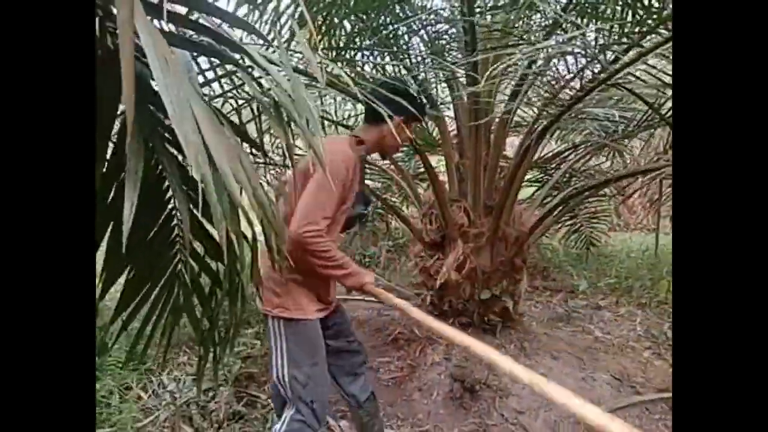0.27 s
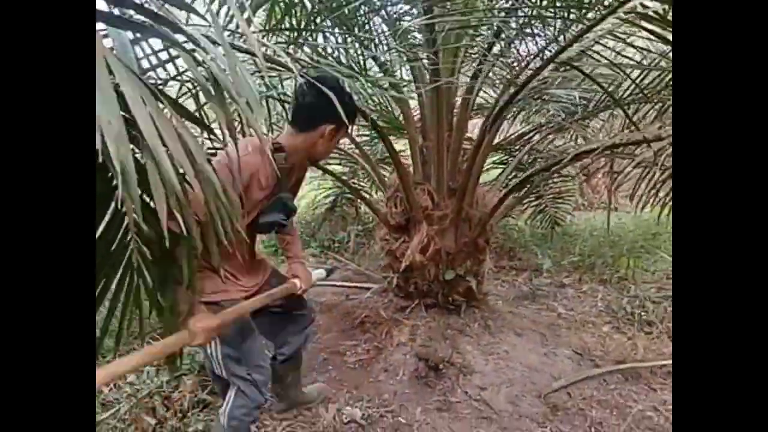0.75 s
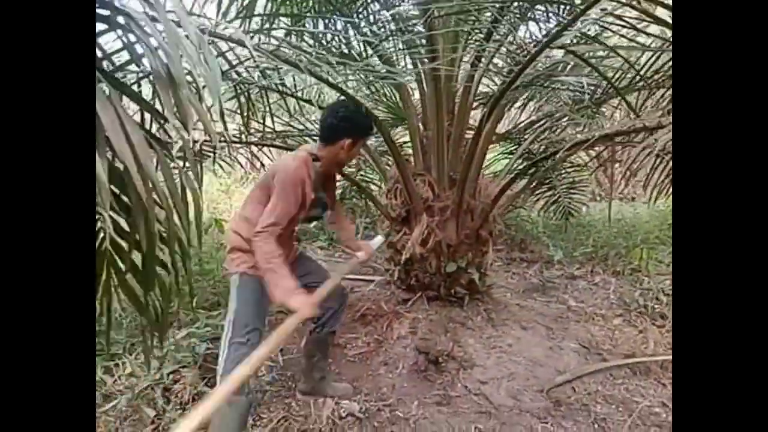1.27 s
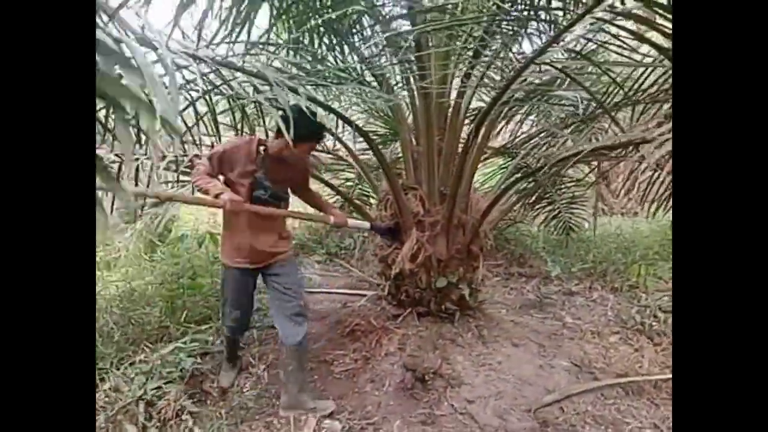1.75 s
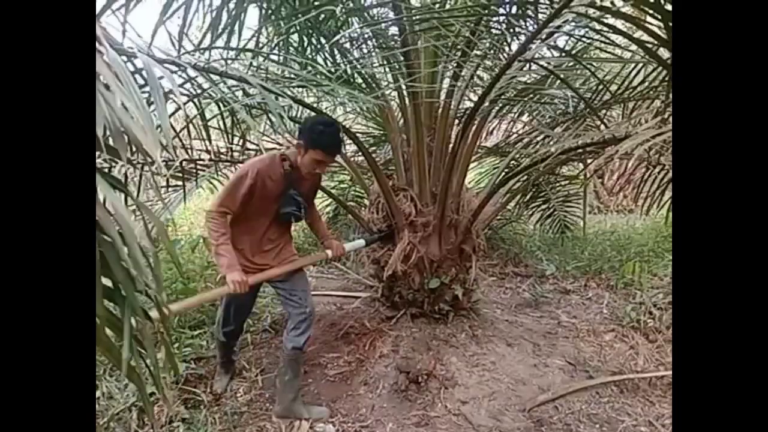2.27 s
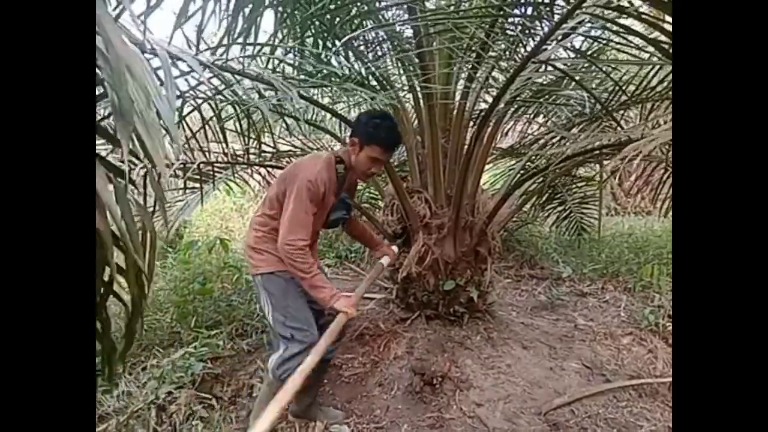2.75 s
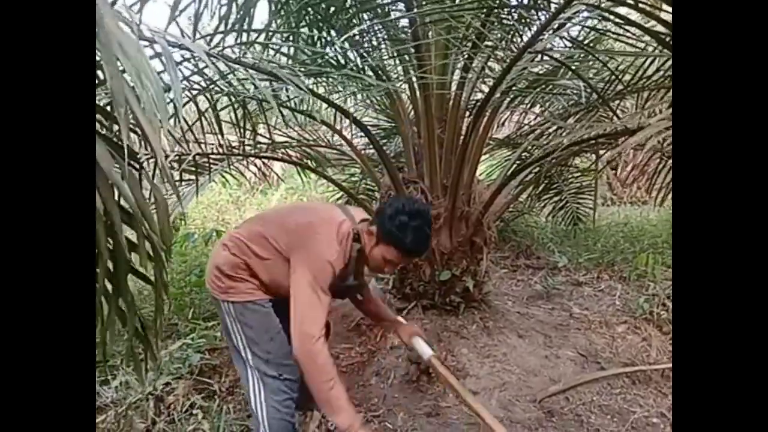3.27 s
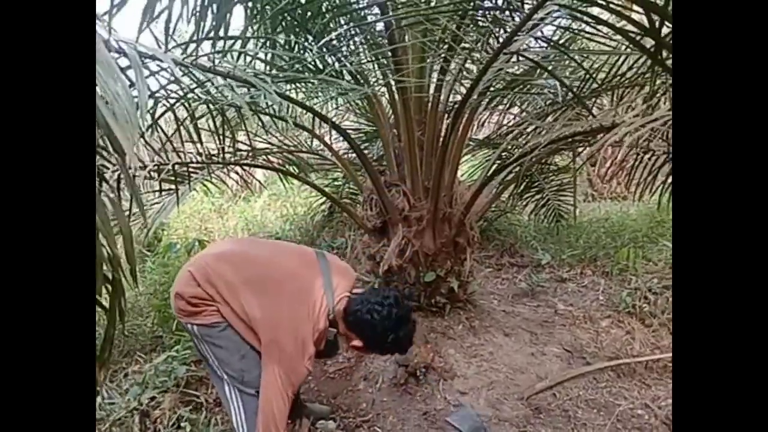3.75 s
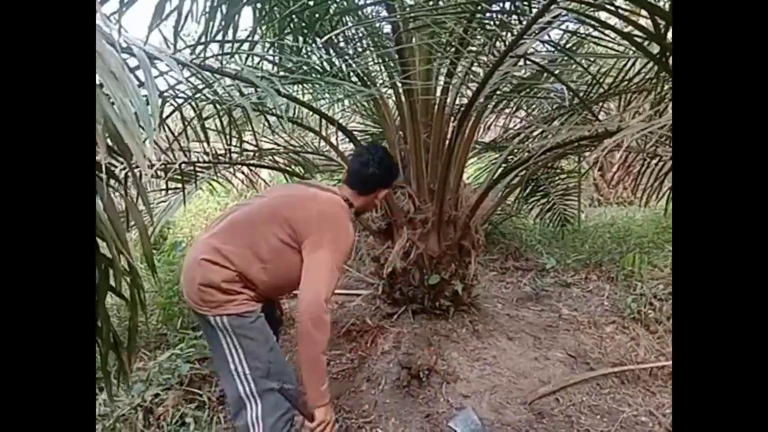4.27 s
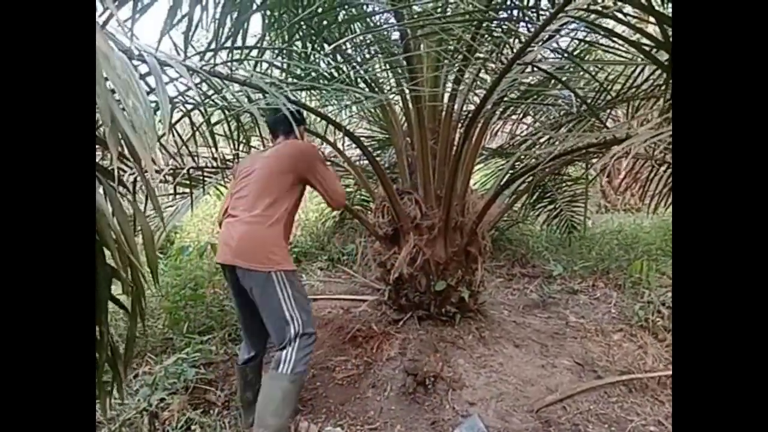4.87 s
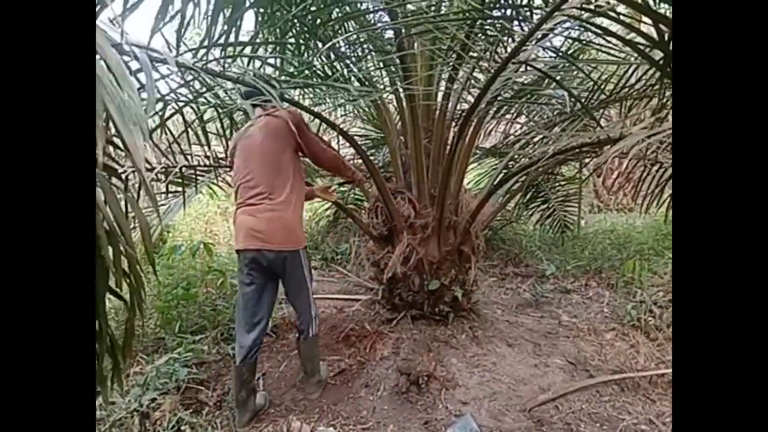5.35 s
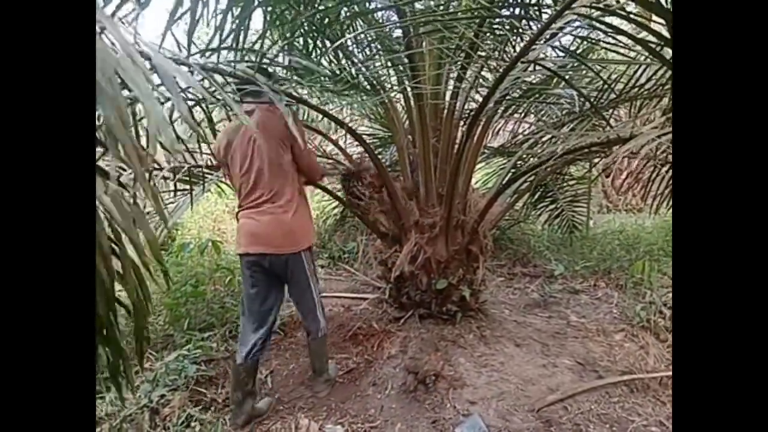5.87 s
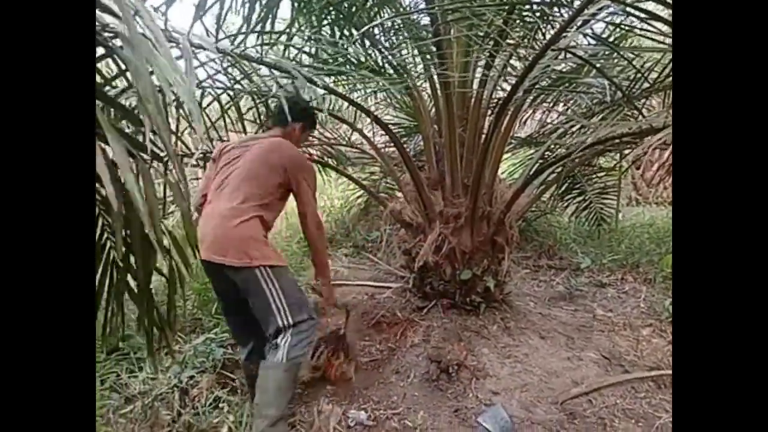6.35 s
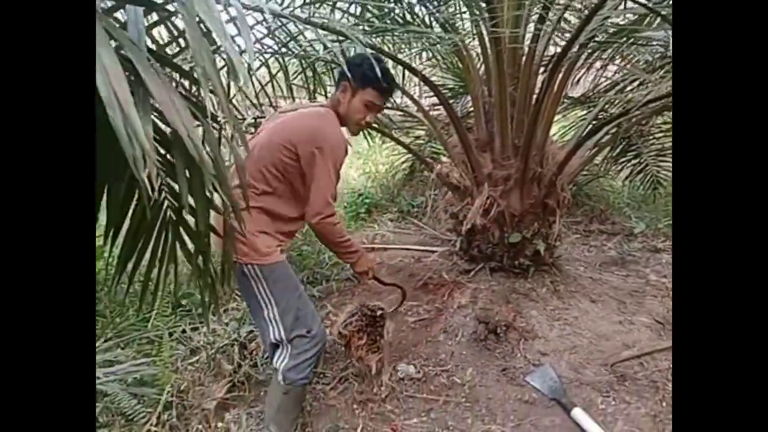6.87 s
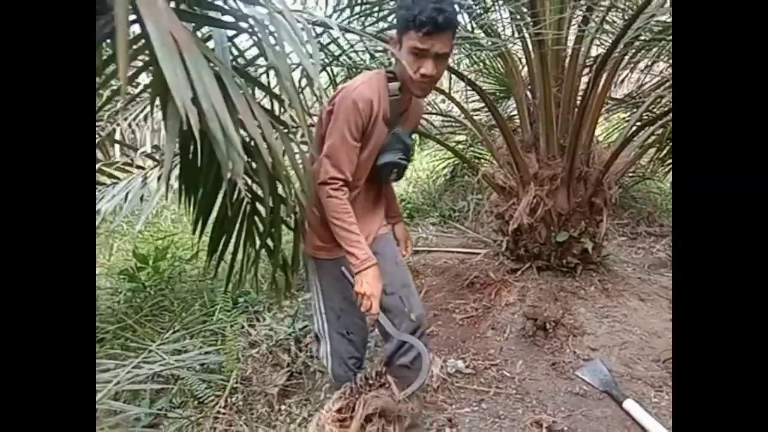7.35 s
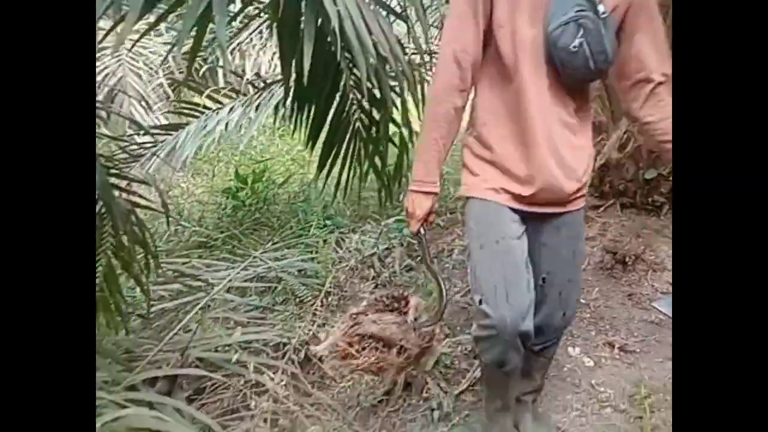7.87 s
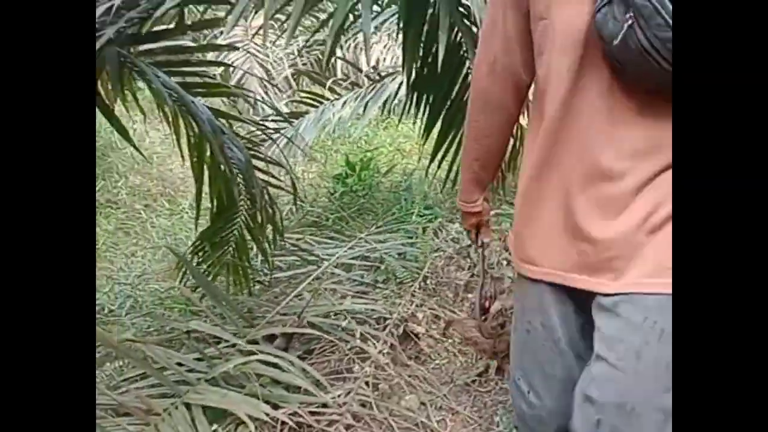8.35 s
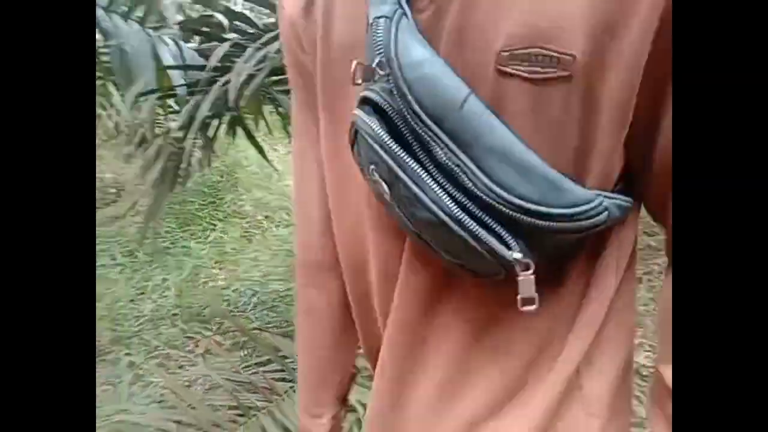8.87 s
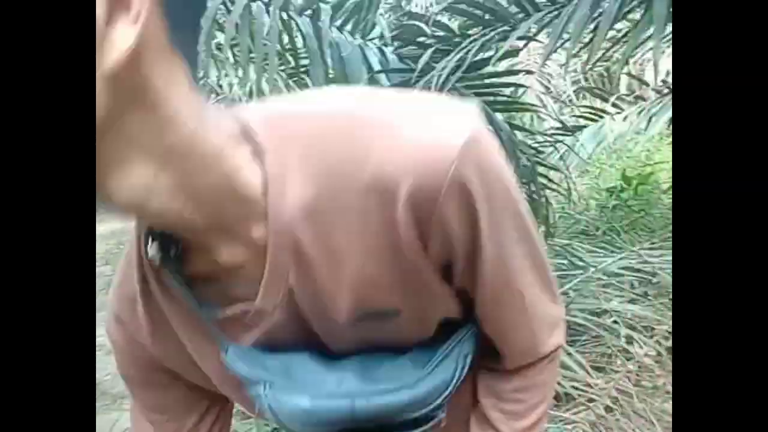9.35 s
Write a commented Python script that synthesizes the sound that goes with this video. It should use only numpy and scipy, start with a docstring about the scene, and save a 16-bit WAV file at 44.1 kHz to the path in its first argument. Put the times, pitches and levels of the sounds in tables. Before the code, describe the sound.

Close, slightly clipped phone pickup among palms. Dry leaves brush, then a crunchy chop and loud tearing cracks burst out together. Woody knocks and creaks follow as the blade is levered, and the pole lands on soil with twig snaps and a faint steel ring. After a quieter pause a hook bites fibre; scattered snaps, soft thuds, boot crunches and frond swishes finish over a faint high cricket trill.

```python
"""In an oil-palm plantation a worker drives a long chisel into a palm; a frond stalk splits, the pole drops.
A steel hook then spikes a fruit bunch, which is dragged and tossed on dry fronds as boots crunch through litter.
Fracture is modelled by random grains, struck bodies by decaying modes, sliding leaves by shaped noise.
Insects trill as modulated tones and the air is faint noise; a phone with one microphone stands close by."""
import sys
import numpy as np
from scipy import signal
from scipy.fft import rfft, irfft
from scipy.io import wavfile
from scipy.ndimage import uniform_filter1d

SR = 44100
rng = np.random.default_rng(int(sys.argv[2]) if len(sys.argv) > 2 else 0)


def put_to_file(sound):
    """Save the sound as 16-bit audio at rate SR, in the file named by the first command-line argument."""
    columns = np.atleast_2d(sound).T  # one column per channel
    safe = np.clip(columns, -1, 1)
    whole_steps = np.round(safe * 32767)
    wavfile.write(sys.argv[1], SR, whole_steps.astype(np.int16))


N = 423360
TIME = np.arange(N) / SR
AGE = TIME[:SR]  # time since a blow, one second long

# Levels in the tables precede the grove's echo and the phone's response.
# Chisel and hook driven into wet fibre: [t/s, level/dB before a common trim, t60/s, tilt/(dB per octave)]
BLADE_CHOPS = [(1.302, 0.5, 0.13, -0.2), (1.327, -5, 0.049, -2.5), (5.225, -5, 0.087, 2)]
# Bundles of the stalk splitting: [t/s, peak level/dB, tilt/(dB per octave)]
BUNDLE_CRACKS = [(1.5213, 0, 1), (1.5423, 2.5, 2.5), (1.559, -1.5, -2), (1.571, 1, 4.8), (1.5958, 2.5, 0.2),
                 (1.619, -11.5, 4), (1.6269, -3.5, -1.5)]
# Blade knocking on the damp stalk: [t/s, peak level/dB, splinter level/dB against the wood]
BLADE_KNOCKS = [(1.92, -25, -11), (2.024, -19.5, 18), (2.0655, -20.5, 7), (2.098, -15.5, 1.5),
                (2.835, -8.5, 10), (2.878, -11.5, 25), (5.921, -18, -21)]
# Stalk rubbed and strained: [t/s at the height, level/dB, half length/s]
STALK_CREAKS = [(1.177, -35.5, 0.056), (2.152, -36, 0.08), (2.801, -26.5, 0.015), (2.848, -31, 0.031)]
# Litter and fibre crushed: [t/s at the height, level/dB, half length/s, tilt/(dB per octave)]
LITTER_CRUNCHES = [(0.154, -20, 0.038, 1), (0.528, -31, 0.0067, 2.5), (1.503, -26.5, 0.055, -3),
                   (1.612, -18.5, 0.024, 2), (2.42, -34.5, 0.014, 5.5), (2.617, -40, 0.018, 4),
                   (2.837, -29.5, 0.043, -2.5), (3.202, -14, 0.0067, 17), (3.351, -33, 0.026, -2.5),
                   (3.481, -16.5, 0.015, 7), (3.504, -11, 0.0051, 2.5), (3.726, -27, 0.029, -1.5),
                   (4.009, -25.5, 0.015, 7), (4.132, -31, 0.015, 3), (5.753, -16.5, 0.0058, -1),
                   (5.777, -8.5, 0.008, 2), (5.882, -14.5, 0.0079, 2.5), (6.337, -30, 0.014, 3.5),
                   (6.389, -19.5, 0.014, 1), (6.6, -22, 0.0048, 3), (6.778, -27.5, 0.016, 2.5),
                   (7.506, -29.5, 0.0083, -3.5), (8.058, -15.5, 0.0091, 1), (8.685, -30.5, 0.023, -7),
                   (8.712, -15.5, 0.0064, 6), (9.308, -12.5, 0.0054, -3.5)]
# Dry twigs and leaflets snapping: [t/s, peak level/dB, f/Hz]
TWIG_SNAPS = [(0.025, -4, 3770), (0.875, -3, 10600), (1.124, -10.5, 7100), (1.61, -4, 6900),
              (1.652, -2, 9500), (2.321, -19, 7320), (3.332, 2.5, 5560), (3.36, -5, 3170),
              (3.482, -1, 2720), (4.002, -17, 5300), (5.693, -0.5, 9000), (6.372, -9, 3800),
              (6.421, -13, 2060), (6.601, -4.5, 3630), (6.686, 0, 11900), (7.101, -12, 4430),
              (7.214, -11.5, 3900), (7.778, -19, 1990), (8.057, -13, 2400), (8.079, -5, 3020),
              (8.45, -12, 2000), (8.581, 2, 7400), (8.714, -5.5, 2460), (8.782, -13, 1440)]
# Boots, pole and fruit landing on soil: [t/s, peak level/dB, f/Hz, nominal t60/s]
SOIL_THUDS = [(1.22, -27.5, 190, 0.2), (1.592, -24, 248, 0.23), (2.976, -13, 137, 0.07),
              (3.468, -19.5, 360, 0.11), (3.501, -11.5, 119, 0.046), (3.516, -12.5, 91, 0.2),
              (3.56, -31, 206, 0.67), (3.693, -25.5, 320, 0.11), (3.733, -22, 291, 0.051),
              (3.75, -24.5, 101, 0.08), (4.156, -39, 300, 0.27), (4.71, -41, 283, 0.16),
              (5.228, -15.5, 363, 0.1), (5.774, -13, 305, 0.057), (6.341, -22.5, 138, 0.14),
              (6.383, -18, 169, 0.041), (6.404, -21, 112, 0.073), (6.419, -14.5, 454, 0.02),
              (6.559, -15.5, 228, 0.038), (8.003, -30, 169, 0.1), (8.042, -18, 171, 0.066),
              (8.688, -16.5, 246, 0.073), (9.241, -11, 335, 0.048), (9.257, -18, 121, 0.095),
              (9.279, -12, 134, 0.082), (9.317, -14.5, 234.6, 0.2)]
# Hollow pole and handle knocked: [t/s, peak level/dB, f/Hz, t60/s]
POLE_KNOCKS = [(.286, -17, 1320, 0.058), (3.519, -6, 985, 0.049), (3.738, -17, 950, 0.03),
               (8.953, -12, 725, 0.015), (9.177, -15.5, 1340, 0.023)]
# Steel touched: [t/s, peak level/dB, ring time/s, f/Hz of the mode favoured by the point of contact]
STEEL_CLINKS = [(2.88, -20, 0.13, 3420), (4.001, -23, 0.2, 3170), (4.138, -21.5, 0.2, 5100),
                (4.29, -28.5, 0.51, 3420)]
# Hook dragged over grit: [t/s at the height, level/dB, half length/s]
HOOK_DRAGS = [(3.961, -42.5, 0.043), (4.134, -42.5, 0.16)]
# Fronds brushed by the pole, a leg or the bunch:
# [t/s at full contact, level/dB, attack/s, hold/s, release/s, treble balance/dB: high for dry fine leaves]
FROND_BRUSHES = [(0, -25, .02, 0.24, 0.32, -5.5), (0.747, -35.5, 0.082, 0.038, 0.1, 0),
                 (0.889, -46, 0.068, 0.013, 0.201, 5), (1.131, -38, 0.082, 0.069, 0.45, -2),
                 (1.371, -33.5, 0.1, 0.14, .1, -9.5), (1.555, -24.5, 0.068, 0.12, 0.27, -8),
                 (1.916, -32, 0.042, 0.013, 0.033, -8.5), (2.087, -42, .25, 0.053, 0.32, -9),
                 (2.974, -41.5, .04, 0.044, 0.061, -8), (3.189, -39.5, .03, 0.08, 0.12, 1.5),
                 (3.34, -33.5, .05, 0.016, 0.16, 0.5), (3.519, -33.5, 0.06, 0.0092, 0.17, -13),
                 (3.717, -34.5, 0.054, 0.022, 0.084, 2), (4.1, -41.5, 0.084, 0.03, 0.24, 0),
                 (4.755, -47.5, 0.076, 0.011, 0.033, -7), (5.323, -47.5, 0.084, 0.022, 0.26, -11),
                 (5.702, -23, 0.046, 0.18, 0.13, -7), (6.572, -31.5, 0.096, 0.057, 0.12, -8),
                 (6.766, -43.5, 0.11, 0.35, 1, -7.5), (7.514, -39.5, 0.22, 0.036, 0.21, -12.5),
                 (7.821, -37.5, 0.042, 0.0074, 0.036, -15), (7.999, -25, 0.02, 0.062, 0.1, -8),
                 (8.155, -28.5, 0.16, 0.05, 0.21, -4.5), (8.586, -30.5, 0.22, 0.16, 0.052, -7),
                 (8.851, -45, 0.096, 0.11, .2, -20), (9.093, -37, 0.068, 0.11, 0.11, -9),
                 (9.305, -27, 0.1, 0.022, 0.098, -14), (9.473, -38, 0.13, 0.012, 0.25, -12.5)]

# Modes of the steel: [f/Hz, level/dB, share of the ring time]
STEEL_MODES = [(2277, -5, 0.4), (2440, -4.5, 0.6), (3170, -2.5, 0.46), (3420, -1, 0.99), (3920, -5, .55),
               (5100, 2.5, 0.31), (5590, -5, 0.28)]
# Modes of the frond stalk: [mean f/Hz, mean level/dB, t60/s]
STALK_MODES = [(301, -0.5, 0.06), (696, 3.5, 0.037), (811, 5, 0.023), (1260, -7, 0.031), (1580, -5, 0.058),
               (2130, -12, 0.025), (2860, -10.5, 0.022)]
# Resonances and dips of the phone's port: [f/Hz, quality, level/dB]
PORT_RESONANCES = [(1262, 25.7, 10.5), (6335, 8.6, -8.5), (8060, 7.6, -8), (13160, 2.9, -9.5),
                   (14500, 10, 8.5)]

# Relative spectra of leaves, wet fibre, air and one split: [f/Hz, level/dB per Hz]
LEAF_SPECTRUM = [(40, -45.5), (90, -13), (300, -6), (480, -4.5), (700, -4), (1000, -3), (1400, -1),
                 (1900, -4), (3200, -1), (4400, -5.5), (5600, -2.5), (9800, -10.5), (15500, -18.5)]
FIBRE_SPECTRUM = [(60, -40), (120, -10.5), (450, -12.5), (720, 5), (1000, -9.5), (1300, -2.5), (1700, -5),
                  (2500, -0.5), (4200, -7.5), (5500, -6), (9000, -12.5), (15500, -29.5)]
AIR_SPECTRUM = [(20, -13.5), (50, 5.5), (110, 9.5), (260, 5), (600, -1), (1200, -3), (2000, -8),
                (5500, -11), (8500, -30.5), (13000, -12.5), (15500, -29)]
SPLIT_SPECTRUM = [(250, -20.5), (700, 4), (2600, -5.5), (6000, -13.5), (15000, -37)]
# Relative spectra of settling soil and a tearing bundle: [f/Hz, level/dB per Hz]
SOIL_SPECTRUM = [(30, -29.5), (60, -37), (90, -1.5), (350, -5.0), (600, -22.0), (1500, -29.5)]
SPLINTER_SPECTRUM = [(200, -23), (1000, -3.0), (2300, 1.0), (5500, -19.5), (8000, -21.5), (15000, -40.5)]
# Level of the insects, interpolated: [t/s, level/dB]
INSECT_LEVELS = [(0, -54), (2.8, -48.5), (5, -52.5), (7.8, -54.5), (9.6, -52)]

BEND_S = 0.007  # bending-wave delay at 1 kHz, from which the delay at 4 kHz is subtracted
KNOCK_HZ, KNOCK_RISE_HZ_PER_S, KNOCK_S = 411, 62000, 0.0041  # a rising dull note, loudest after KNOCK_S
STALK_RING_DB = -5  # peak against the dull note
RATCHET_START_S, RATCHET_GAP_S = 2.128, 0.0202
RATCHET_DB, RATCHET_STEP_DB = -15.5, -3.5  # first peak and change per slip
RATCHET_SPLINTER_DB = 1  # against the wood
SETTLE_DB, SETTLE_S = -21, 1.95  # swaying after a brush: relative level and time for a tenfold fall
SWAY_DB, SWAY_PER_S = 2.2, 14  # wavering of the lightest contact: nominal spread and random steps per second
AIR_DB = -55.5  # mean level
TOP_HZ = 15500  # upper limit of the phone


def chops():
    """Shear fracture: the edge breaks a dense run of fibres, whose resistance brakes it."""
    out = np.zeros(N)
    attack = 1 - np.exp(-AGE / 0.0035)
    for s, db, t60, tilt_db in BLADE_CHOPS:
        shear = colour(grains(rate=9000, spread_db=3.5, size=SR), FIBRE_SPECTRUM, tilt_db)
        add(out, s, undb(db - 1.5) * shear * fade(t60) * attack)
    return out


def cracks():
    """Dispersion of bending waves: the treble of each torn bundle arrives first, the woody low notes later."""
    out = np.zeros(N)
    hz = np.fft.rfftfreq(SR, 1 / SR) + 1
    delay = BEND_S * (np.sqrt(1000 / np.minimum(hz, 4000)) - np.sqrt(1000 / 4000)) + .0003
    along_stalk = np.exp(-2j * np.pi * np.cumsum(delay))  # phase is delay summed over 1 Hz bins
    for s, db, tilt_db in BUNDLE_CRACKS:
        tear = rng.standard_normal(SR) * fade(.009) + 5 * (AGE == 0)
        dispersed = irfft(rfft(tear) * along_stalk, SR)
        split = colour(dispersed, SPLIT_SPECTRUM, tilt_db) * (AGE < .5)
        crack = peak(split, 0) + peak(splinter(), -2) + peak(stalk_ring(), -15.5)
        add(out, s, peak(crack, db))
    return out


def levering():
    """Impact and stick-slip: the blade knocks on the stalk; small slips run together as a creak."""
    out = np.zeros(N)
    for s, db, splinter_db in BLADE_KNOCKS:
        add(out, s, peak(knock(splinter_db), db))
    for s, db, width in STALK_CREAKS:
        slips = grains(rate=1500, spread_db=-1.0, size=SR)
        creak = signal.fftconvolve(slips, stalk_ring() * fade(0.064))[:SR]
        add(out, s - .5, undb(db) * swell(width) * unit(creak))
    return out


def ratchet(count=6):
    """Stick-slip: the levered, wedged blade slips in an even run of knocks, weaker as the strain runs out."""
    out = np.zeros(N)
    for k in range(count):
        slip = peak(knock(RATCHET_SPLINTER_DB), RATCHET_DB + k * RATCHET_STEP_DB)
        add(out, RATCHET_START_S + k * RATCHET_GAP_S, slip)
    return out


def knock(splinter_db):
    """Impact on damp wood: a few dull cycles rise in pitch as the blade bites, with a click and a ring."""
    cycles = np.sin(2 * np.pi * (KNOCK_HZ + KNOCK_RISE_HZ_PER_S * AGE / 2) * AGE)
    thock = cycles * AGE ** 2 * np.exp(-(AGE / KNOCK_S) ** 2)
    return peak(thock, 0) + peak(stalk_ring(), STALK_RING_DB) + peak(splinter(), splinter_db)


def splinter():
    """Sudden release of strain: a tearing fibre bundle gives a short, bright click."""
    return colour(rng.standard_normal(SR), SPLINTER_SPECTRUM) * fade(0.016)


def stalk_ring():
    """Modal superposition: damped modes of the stalk vary a little in level and pitch from ring to ring."""
    ring = np.zeros(SR)
    for k, (hz, db, t60) in enumerate(STALK_MODES):
        gain = undb(db + 2 * rng.normal()) * (-1) ** k
        pitch = hz * (1 + 0.022 * rng.normal())
        ring += gain * fade(t60) * np.sin(2 * np.pi * pitch * AGE)
    return ring


def crunches():
    """Fracture under load: beneath a boot or the dragged bunch, fibres break as the load rises and falls."""
    out = np.zeros(N)
    fibres = whiten(crackle(rate=6000, spread_db=2.5, size=N, ring_t60=0.0016))
    for s, db, width, tilt_db in LITTER_CRUNCHES:
        excerpt = np.roll(fibres, -int(s * SR))[:SR]
        swarm = colour(excerpt, LEAF_SPECTRUM, tilt_db)
        add(out, s - .5, undb(db) * swell(width) * swarm)
    return out


def snaps():
    """Brittle fracture: a sharp click, a second as the far side parts, and a spray of splinters."""
    out = np.zeros(N)
    for s, db, hz in TWIG_SNAPS:
        click = peak(band(rng.standard_normal(SR) * fade(0.002), hz, q=1.0), 0)
        splinters = band(grains(rate=12000, spread_db=1.5, size=SR), hz, q=1.0)
        spray = peak(splinters * fade(0.084), -12)
        add(out, s + 0.0012, peak(click + spray, db))
        add(out, s + 0.0015 + rng.uniform(0.00085, .005), peak(click, db - 8.5))
    return out


def thuds():
    """Damped oscillation: soil bounces at one pitch under a landed weight and rumbles as it settles."""
    out = np.zeros(N)
    for s, db, hz, t60 in SOIL_THUDS:
        bounce = np.sin(2 * np.pi * hz * AGE) * fade(0.86 * t60)
        settle = colour(rng.standard_normal(SR), SOIL_SPECTRUM) * fade(1.74 * t60)
        attack = 1 - np.exp(-AGE * hz / 0.6)
        add(out, s, peak((bounce + undb(-7.0) * settle) * attack, db))
    return out


def pole():
    """Resonance of a hollow body: a knock excites one damped note and a short fibrous noise."""
    out = np.zeros(N)
    for s, db, hz, t60 in POLE_KNOCKS:
        note = np.sin(2 * np.pi * hz * AGE) * fade(t60)
        noise = colour(rng.standard_normal(SR), FIBRE_SPECTRUM) * fade(0.068)
        add(out, s, peak(note + 0.29 * noise, db))
    return out


def clinks():
    """Modal excitation: the point of contact favours the steel modes near one frequency."""
    out = np.zeros(N)
    for s, db, t60, favoured_hz in STEEL_CLINKS:
        ring = np.zeros(SR)
        for hz, mode_db, share in STEEL_MODES:
            boost_db = 6.5 * np.exp(-((hz - favoured_hz) / 170) ** 2)
            ring += undb(mode_db + boost_db) * np.sin(2 * np.pi * hz * AGE) * fade(t60 * share)
        add(out, s, peak(ring, db))
    return out


def drags():
    """Friction-driven resonance: grit feeds each ground-damped steel mode in turn as the contact shifts."""
    out = np.zeros(N)
    for s, db, width in HOOK_DRAGS:
        drag = np.zeros(SR)
        for hz, mode_db, _ in STEEL_MODES:
            feed = undb(mode_db + 6 * walk(25.0, size=SR))
            drag += feed * band(grains(rate=300, spread_db=1, size=SR), hz, q=32)
        add(out, s - .5, undb(db) * swell(width) * unit(drag))
    return out


def rustle():
    """Sliding friction: leaflets hiss and catch in crackling clusters, bright if dry and fine, dull if heavy."""
    db, treble_db = brushing()
    light = np.clip((-37.5 - db) / 10, 0, 1)  # 0 in firm contact, 1 when the leaves barely touch
    catches = whiten(crackle(rate=6000, spread_db=2.5, size=N, ring_t60=0.008, count=30))
    catches = catches * undb(2 * np.tanh(walk(70)))
    ticks = whiten(crackle(rate=1100, spread_db=1, size=N, ring_t60=0.008))
    slide = 0.7 * rng.standard_normal(N)
    contact = (catches + slide) * (1 - light / 2) + light * ticks / 2
    leaves = colour(contact, LEAF_SPECTRUM)
    bulk = undb(-13.5 - 0.62 * treble_db) * unit(cut(leaves, 1250, "low"))
    blades = undb(-2.5) * unit(cut(leaves, [1600, 7000], "band"))
    edges = undb(treble_db + 4.0) * unit(cut(leaves, 7870, "high"))
    sway_db = SWAY_DB * walk(SWAY_PER_S) * light  # a light touch wavers
    return undb(db + sway_db) * (bulk + blades + edges)


def brushing():
    """Addition of powers: overlapping brushes, each with its sway, give the leaves' level and treble in dB."""
    power, treble = 1e-12, 0
    for s, db, attack, hold, release, treble_db in FROND_BRUSHES:
        contact = stroke(s, attack, hold, release) ** 2
        swaying = undb(2 * SETTLE_DB) * stroke(s, attack, hold, SETTLE_S) ** 2
        push = undb(2 * db) * (contact + swaying)
        power = power + push
        treble = treble + push * treble_db
    return 10 * np.log10(power), treble / power  # treble is weighted by power


def stroke(s, attack, hold, release):
    """Exponential rise and decay: attack and release are the times for a tenfold change in amplitude."""
    before = np.maximum(s - TIME, 0) / max(attack, .005)
    after = np.maximum(TIME - s - hold, 0) / max(release, .005)
    return 10 ** -(before + after)


def insects():
    """Amplitude modulation: a cricket trills in throbs with a weak octave; a farther chorus blurs to a band."""
    throb_phase = 2 * np.pi * np.cumsum(20.3 + 2.6 * walk(14)) / SR
    throb = (.5 + .5 * np.sin(throb_phase)) ** .5
    wing = 2 * np.pi * np.cumsum(7330 + 45 * walk(700)) / SR
    tone = np.sin(wing) + undb(-19.0) * np.sin(2 * wing)
    trill = unit(throb * tone) * undb(2 * walk(230) + 2 * walk(10))
    chorus = unit(band(band(rng.standard_normal(N), 7280, q=17), 7280, q=17))
    level_db = np.interp(TIME, *np.transpose(INSECT_LEVELS))
    return undb(level_db) * (trill + undb(-4.5) * chorus)


def air():
    """Broadband noise: the faint wash of the plantation wanders slightly in level."""
    return undb(AIR_DB + 0.45 * walk(5)) * colour(rng.standard_normal(N), AIR_SPECTRUM)


def grove(x):
    """Diffuse scattering: trunks and fronds return a thin, dull tail."""
    tail = band(rng.standard_normal(SR), 920, q=0.13) * fade(0.24) * (1 - np.exp(-AGE / 0.0031))
    return x + undb(-21.0) * signal.fftconvolve(x, tail / np.linalg.norm(tail))[:N]


def crackle(rate, spread_db, size, ring_t60, count=12):
    """Superposition of fractures: each leaflet has a papery ring, a note and busy moments of its own."""
    out = np.zeros(size)
    for hz in np.geomspace(600, 13000, count):
        noise = (rng.standard_normal(SR) * fade(ring_t60))[:SR // 50]
        note = band(noise_ring := unit(noise), hz * rng.uniform(.97, 1.03), q=count / 2.5)
        ring = noise_ring + 2 * unit(note)
        busy = undb(5.5 * np.tanh(walk(26, size=size)))
        breaks = busy * grains(rate / count, spread_db, size)
        out += signal.oaconvolve(breaks, unit(ring))[:size]
    return unit(out)


def grains(rate, spread_db, size):
    """Random point process: tiny fractures, mostly faint for a positive spread, mostly strong for a negative."""
    out, count = np.zeros(size), int(rate * size / SR) + 1
    when, chance, side = np.random.default_rng(rng.integers(size)).random((count, 3)).T
    strength_db = spread_db * np.minimum(-np.log(1 - chance), 5)
    out[(when * size).astype(int)] = np.sign(side - .5) * undb(strength_db)
    return unit(out)


def walk(rate, size=N):
    """Interpolated random process: smooth wandering at rate steps per second, spread near 1."""
    steps = rng.standard_normal(size // 20)
    return np.interp(TIME[:size] * rate, np.arange(len(steps)), steps)


def swell(width):
    """Load envelope: its height is half a second in, and it is about 10 dB down a half length away."""
    return 1 / (1 + ((AGE - .5) / width) ** 2) ** 1.64


def fade(t60):
    """Exponential decay: the amplitude falls by 60 dB in t60 seconds."""
    return np.exp(-np.log(1000) * AGE / max(t60, .001))


def band(x, hz, q):
    """Simple resonance: gain 1 at its centre, with centre and sharpness kept in a safe range."""
    hz = min(hz, .4 * SR)
    return signal.lfilter(*signal.iirpeak(hz, max(q, 3 * hz / SR), fs=SR), x)


def cut(x, hz, kind):
    """Frequency selection: a steep low-, high- or band-pass."""
    return signal.sosfilt(signal.butter(4, hz, kind, fs=SR, output="sos"), x)


def colour(x, spectrum, tilt_db=0):
    """Spectral shaping: apply f/Hz, level/dB points and a tilt per octave, then scale to rms 1."""
    hz, db = np.transpose(spectrum)
    octave = np.log2(np.fft.rfftfreq(len(x), 1 / SR) + 1)
    gain = undb(np.interp(octave, np.log2(hz), db + tilt_db * np.log2(hz)))
    return unit(irfft(rfft(x) * gain, len(x)))


def whiten(x):
    """Spectral equalization: even out the long-term spectrum and leave the short-lived colours."""
    bins = rfft(x)
    power = uniform_filter1d(np.abs(bins) ** 2, size=len(x) // 200)
    return unit(irfft(bins / np.sqrt(power), len(x)))


def undb(db):
    """Logarithmic level: decibels to amplitude gain."""
    return 10 ** (np.asarray(db) / 20)


def unit(x):
    """Power normalization: scale to rms 1."""
    return x / np.std(x)


def peak(x, db):
    """Peak normalization: scale to a peak level in dB."""
    return x * undb(db) / np.abs(x).max()


def add(out, s, x):
    """Linear superposition: mix a sound in at time s."""
    i = int(s * SR)
    out[max(i, 0):i + len(x)] += x[max(-i, 0):N - i]


def scene():
    """Linear superposition: the work and the surroundings reach one microphone, heard alike on both sides."""
    stalk = chops() + cracks() + levering() + ratchet()
    litter = crunches() + snaps() + thuds() + rustle()
    tools = pole() + clinks() + drags()
    return np.tile(grove(stalk + litter + tools) + insects() + air(), (2, 1))


def record(dry):
    """Port resonance and overload: the phone thins the bass, colours mids and top, and clips high peaks."""
    voiced = signal.sosfilt(signal.butter(2, 60, "high", fs=SR, output="sos"), dry)
    for hz, q, db in PORT_RESONANCES:
        voiced = voiced + (undb(db) - 1) * band(voiced, hz, q)
    top_limit = signal.ellip(10, .2, 70, TOP_HZ, fs=SR, output="sos")
    return signal.sosfilt(top_limit, np.clip(voiced, -1, 1))


dry = scene()
out = record(dry)
put_to_file(out)
```